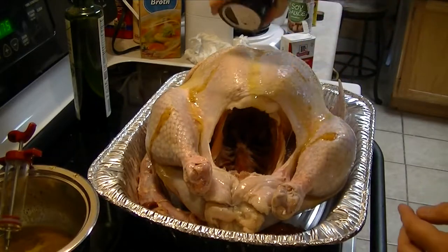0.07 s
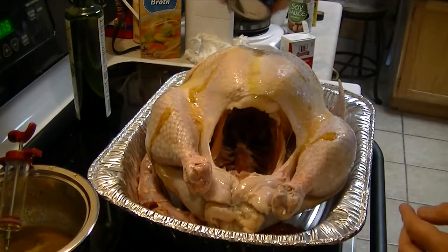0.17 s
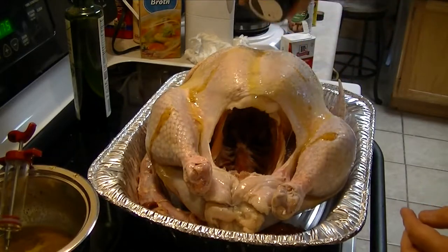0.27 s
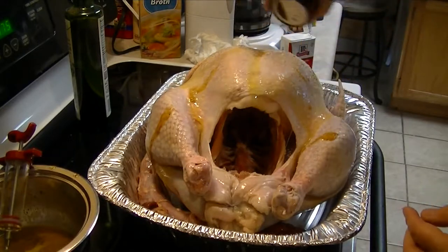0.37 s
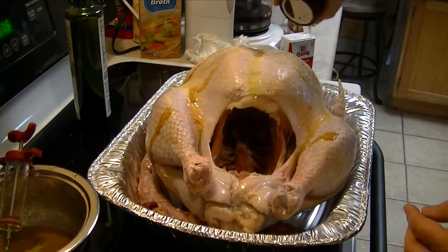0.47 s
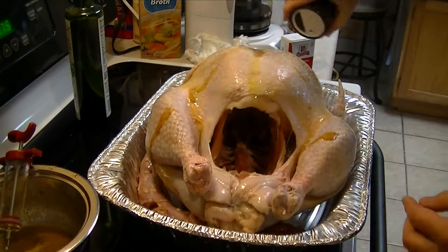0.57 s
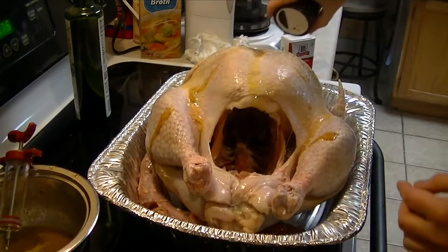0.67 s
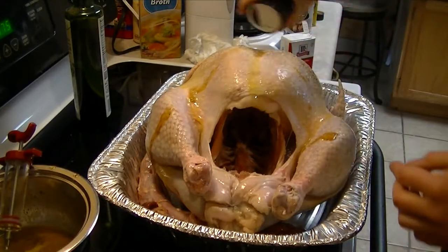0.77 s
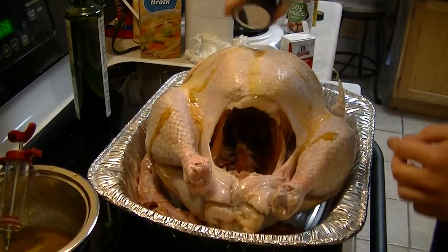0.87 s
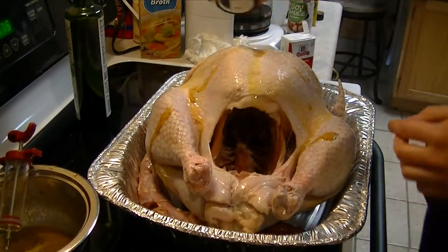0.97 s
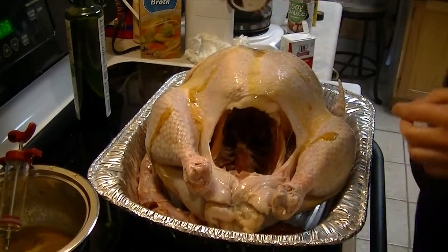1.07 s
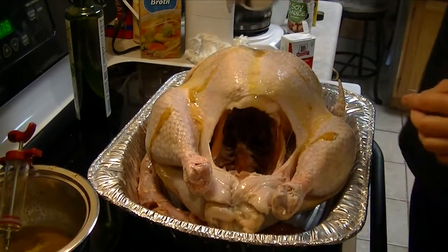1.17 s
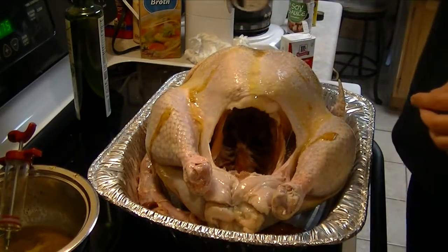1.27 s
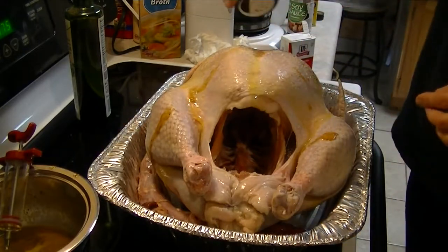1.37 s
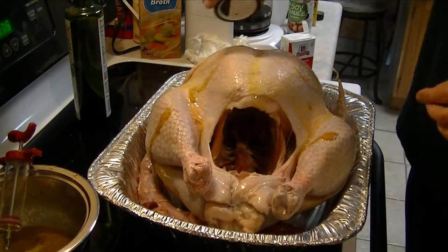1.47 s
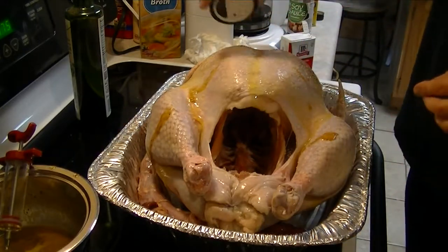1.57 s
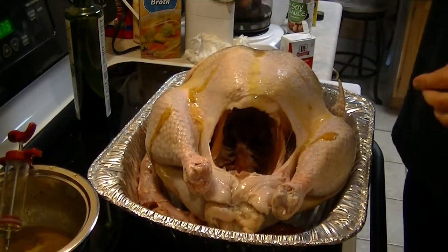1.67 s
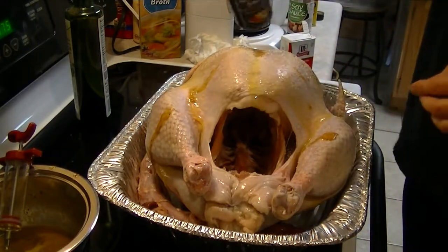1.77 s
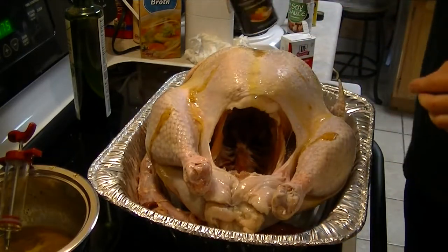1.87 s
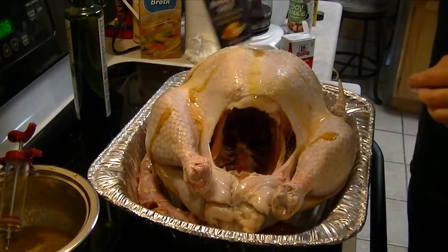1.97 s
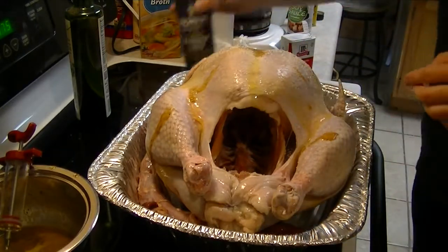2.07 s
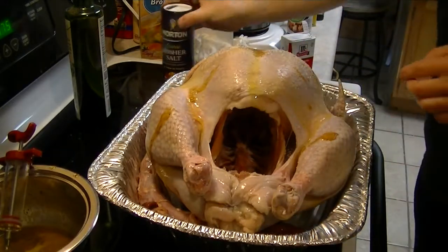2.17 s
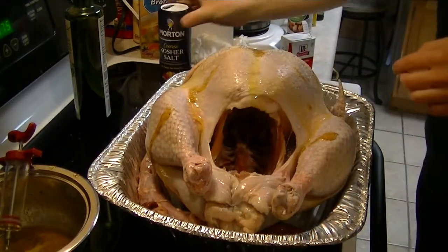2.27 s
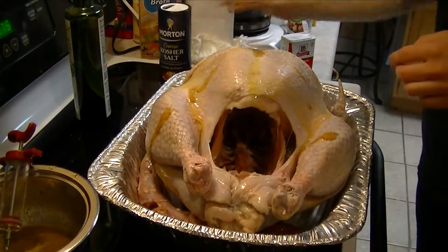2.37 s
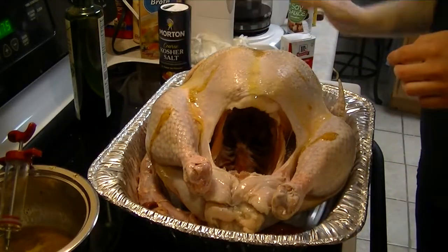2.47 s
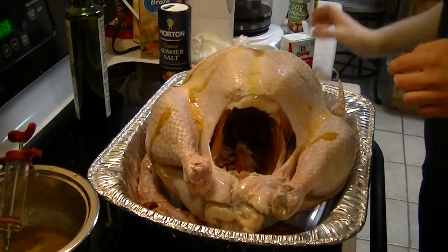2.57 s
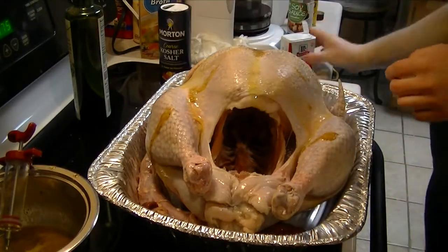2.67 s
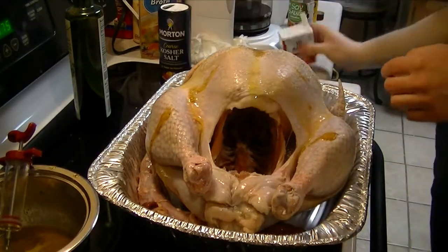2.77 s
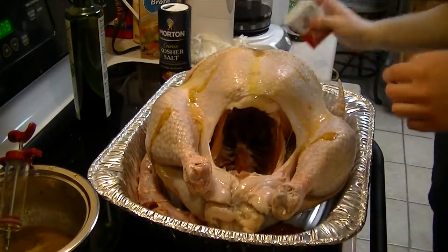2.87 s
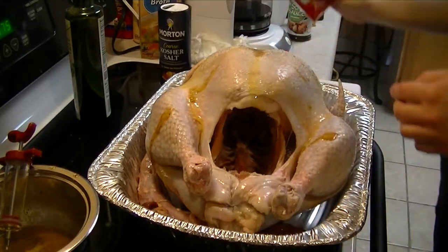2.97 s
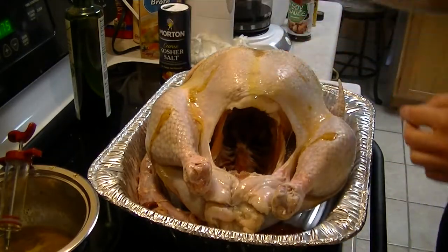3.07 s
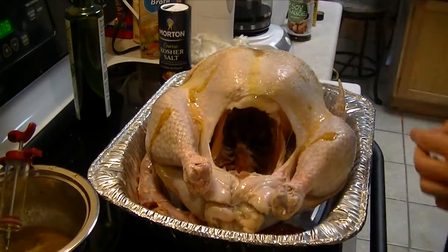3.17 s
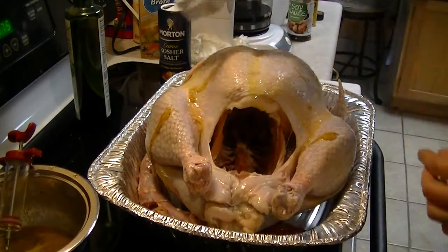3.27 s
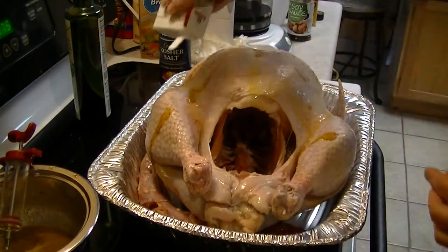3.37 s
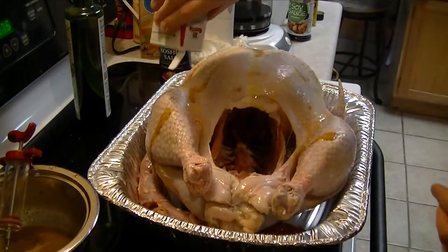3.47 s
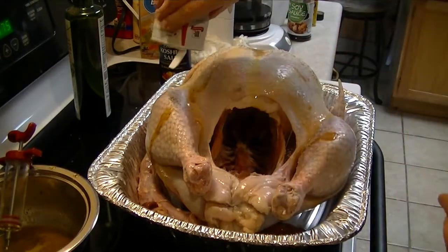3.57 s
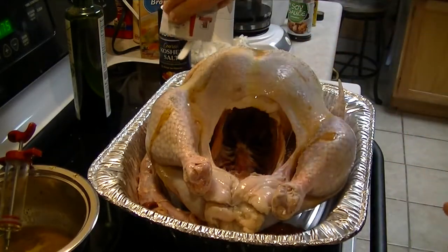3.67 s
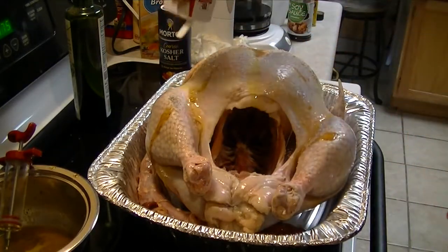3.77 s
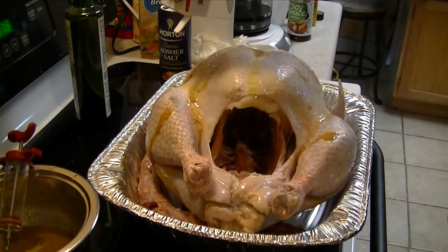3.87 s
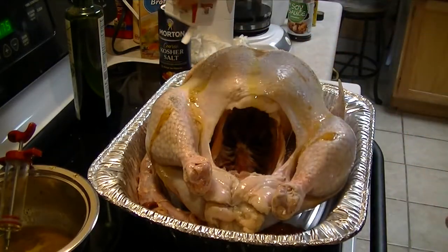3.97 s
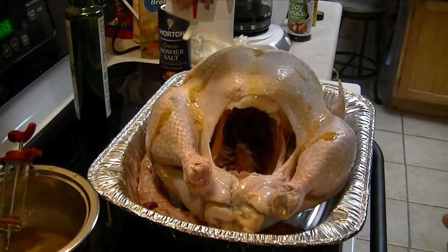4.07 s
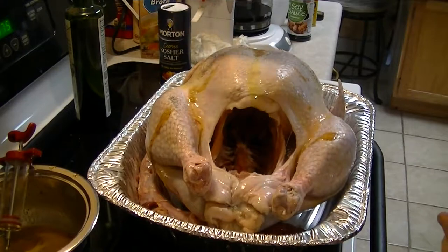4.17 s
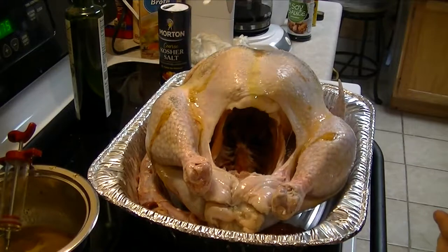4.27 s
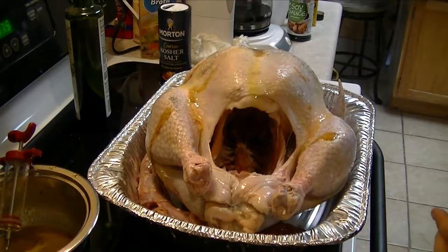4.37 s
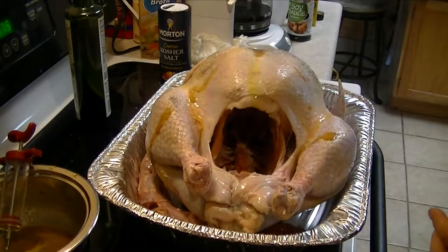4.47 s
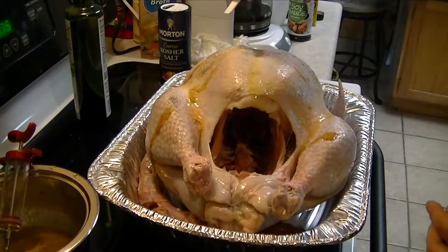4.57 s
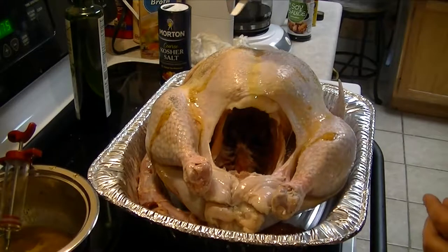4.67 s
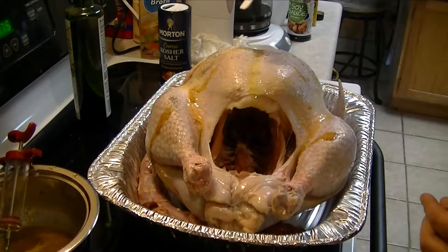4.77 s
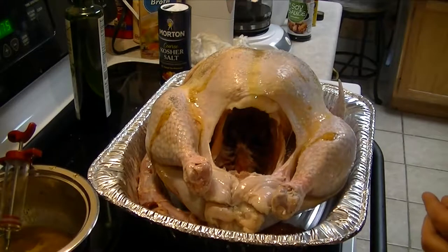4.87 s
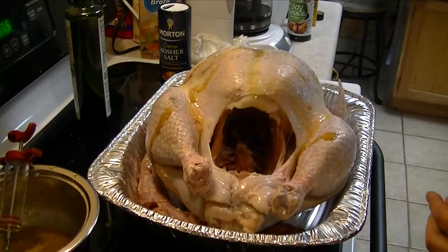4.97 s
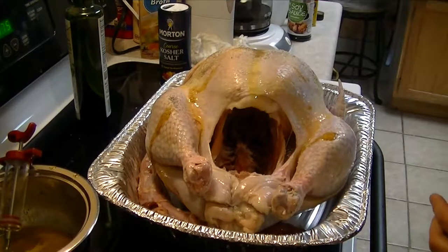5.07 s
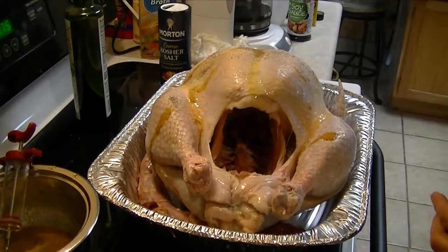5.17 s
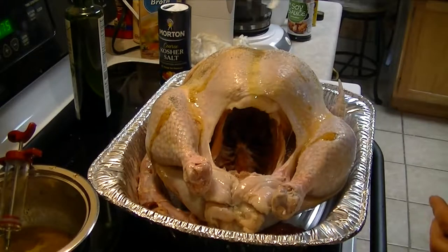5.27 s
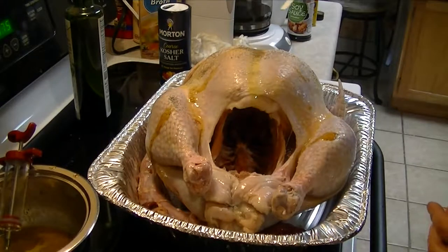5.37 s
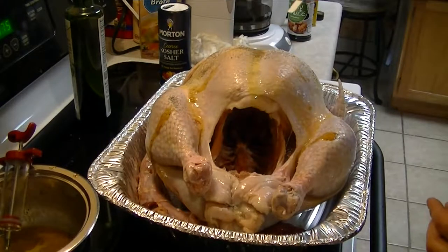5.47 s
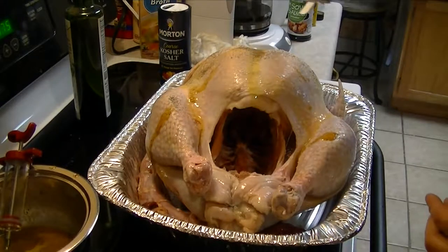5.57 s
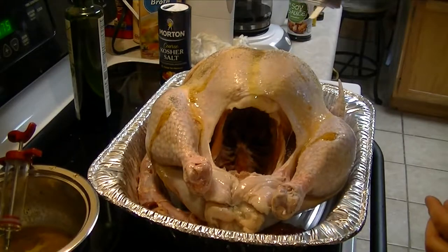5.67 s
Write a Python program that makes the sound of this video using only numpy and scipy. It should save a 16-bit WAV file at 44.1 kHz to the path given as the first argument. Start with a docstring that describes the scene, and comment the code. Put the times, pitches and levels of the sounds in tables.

```python
"""A small kitchen: coarse salt is poured from a canister over a raw turkey, and the canister is set down.
The salt is a dense stream of random grains, combed by gliding echoes off the canister.
The knock is a filtered push, a noise rattle and damped modes. A small pepper tin is picked up, its lid is
snapped open in a run of noise cracks, and it is shaken five or six times a second: the powder slaps the lid
on each down stroke and thuds on the bottom on the way back, as damped modes with puffs of noise."""
import sys
import numpy as np
from scipy import signal
from scipy.fft import rfft, irfft, next_fast_len
from scipy.io import wavfile
from scipy.ndimage import map_coordinates

SR = 44100
rng = np.random.default_rng(int(sys.argv[2]) if len(sys.argv) > 2 else 0)


def inscribe(sig):
    """Save sig as 16-bit PCM at rate SR to the path in sys.argv[1].

    A 1-D sig is mono; a 2-D sig holds one channel per row.
    Samples are clipped to [-1, 1] before scaling.
    """
    pcm = np.round(np.clip(np.atleast_2d(sig).T, -1, 1) * 32767)
    wavfile.write(sys.argv[1], SR, pcm.astype(np.int16))


N = 252252  # length in samples
T = np.arange(SR // 3) / SR  # time within one hit, s
TOP_HZ = 15800  # upper band limit


# level_db is a relative mix level; some players add a fixed gain to it.
def amp(db):
    """Decibels to gain."""
    return 10 ** (np.asarray(db) / 20)


def unit(x):
    """Scale to rms 1."""
    return x / np.sqrt(np.mean(x ** 2) + 1e-20)


def norm(x):
    """Scale to energy 1."""
    return x / np.sqrt(np.sum(x ** 2) + 1e-20)


def along(points, hz):
    """Read a curve of (Hz, value) points on a log frequency axis."""
    point_hz, values = np.transpose(points)
    return np.interp(np.log(hz + 1), np.log(point_hz + 1), values)


def wobble(rate):
    """A smooth random curve with rate knots a second."""
    knots = rng.standard_normal(int(N * rate / SR) + 4)
    return map_coordinates(knots, [np.arange(N) * rate / SR])


def fade(t, t60):
    """Exponential decay by 60 dB in t60 seconds."""
    return np.exp(-np.log(1000) * t / t60)


def puff(rise):
    """A gain that peaks at 1 after rise seconds and trails off."""
    return T / rise * np.exp(1 - T / rise)


def swell(s, width):
    """A smooth bell-shaped gain that rises to 1 at s seconds and falls again."""
    return np.exp(-((np.arange(N) / SR - s) / width) ** 2)


def colour(x, spectrum):
    """Causal minimum-phase filter with the gain of the (Hz, dB) points."""
    n = x.shape[-1]
    m = 2 * next_fast_len(n // 2 + 2048)
    gain = amp(along(spectrum, np.fft.rfftfreq(m, 1 / SR)))
    cepstrum = irfft(np.log(gain))
    # folding the cepstrum forward in time gives minimum phase
    cepstrum[1:m // 2] *= 2
    cepstrum[m // 2 + 1:] = 0
    return irfft(rfft(x, m) * np.exp(rfft(cepstrum)))[..., :n]


def soften(x, hz):
    """A softer contact loses its treble: a gentle low-pass."""
    return signal.lfilter(*signal.butter(1, min(hz, TOP_HZ), fs=SR), x)


def burst(t60):
    """A dying puff of noise with energy 1."""
    return norm(rng.standard_normal(len(T)) * fade(T, t60))


def grains(spectrum, rate):
    """Tiny random impacts, rate a second, at rms 1."""
    impacts = rng.standard_normal(N) * np.sqrt(rng.poisson(rate / SR, N))
    return unit(colour(impacts, spectrum))


def ring(modes, detune, scatter_db):
    """Damped (Hz, dB, t60 s) modes of alternating sign, a little different on every blow."""
    out = np.zeros(len(T))
    for k, (hz, db, t60) in enumerate(sorted(modes)):
        level = amp(db + scatter_db * rng.normal())
        struck_hz = hz * (1 + detune * rng.normal())
        out += (-1) ** k * level * fade(T, t60) * np.sin(2 * np.pi * struck_hz * T)
    return norm(out)


def sway(x, delay_ms, swing, echo_db):
    """An echo off the moving canister combs the sound with gliding ridges."""
    lag = delay_ms / 1000 * SR * np.exp(swing * wobble(3))
    echo = map_coordinates(x, [np.arange(N) - lag], order=3)
    return unit(x + amp(echo_db) * echo)


# decay of the room's tail: pitch_hz, t60_s
ROOM_DECAY = [(200, 0.46), (1000, 0.2), (4000, 0.27), (12000, 0.33)]


def kitchen(x, near_db, tail_db):
    """Direct sound, quick echoes off counter and cupboards, then the room's tail."""
    hz, t, z = signal.stft(rng.standard_normal(len(T)), SR, nperseg=256)
    decay = fade(t, along(ROOM_DECAY, hz)[:, None])
    tail = signal.istft(z * decay, SR, nperseg=256)[1][:len(T)]
    tail = tail * np.minimum(T / 0.014, 1)  # the tail builds up over 14 ms
    # twelve echoes at random moments and signs
    moments = (rng.uniform(.002, .016, size=12) * SR).astype(int)
    near = np.bincount(moments, rng.choice([-1, 1], size=12), len(T)) * fade(T, t60=.09)
    room = amp(near_db) * norm(near) + amp(tail_db) * norm(tail)
    return x + signal.fftconvolve(x, room)[:len(x)]


def add(track, s, sound):
    """Mix a sound in at s seconds."""
    start = max(round(s * SR), 0)
    track[start:start + len(sound)] += sound[:N - start]


# colour of the room noise: pitch_hz, gain_db
AIR_COLOUR = [(25, -56), (60, -37), (110, -29), (205, -23), (291, -11.5), (352, -5), (414, -10.5),
              (473, -10), (1010, -13), (1980, -14.5), (2660, -21), (3300, -15), (3880, -21), (9990, -30.5),
              (15800, -38.5)]
AIR_DB = -62.5  # mean level, before the flutter


def air():
    """Fluttering kitchen noise and a low drone; a mostly low layer has opposite sign in the two channels."""
    mid = unit(colour(rng.standard_normal(N), AIR_COLOUR))
    drone_colour = [(250, -62.5), (325, -12.0), (350, 0.5), (380, -26.0), (500, -47.5)]
    drone = amp(-78.5) * unit(colour(rng.standard_normal(N), drone_colour))
    side_colour = [(30, -3), (100, -5), (200, 0), (400, 7.0), (900, 5), (2000, -34), (8000, -51)]
    side = amp(-81.5) * unit(colour(rng.standard_normal(N), side_colour))
    return amp(AIR_DB) * mid * amp(0.84 * wobble(15.0)) + drone + np.array([side, -side])


# low, soft shuffles as the cook moves: middle_s, level_db, swell_s
SHUFFLES = [(.82, -62.5, 0.13), (1.05, -63, .12), (1.26, -60, 0.069), (2.68, -60.5, 0.42)]
# dull colour of the shuffles: pitch_hz, gain_db
SHUFFLE_COLOUR = [(120, -29.5), (230, -11.5), (330, 1.5), (400, 3), (520, -7.5), (700, 1), (1200, -32.5)]
# hands scuffing among the containers: start_s, level_db, rise_s
SCUFFS = [(2.428, -51, 0.021), (2.549, -57, 0.047), (2.68, -60.5, 0.077), (2.778, -48.5, 0.008)]
# hollow cardboard colour, shared with the salt slumps: pitch_hz, gain_db
CARDBOARD = [(150, -60), (250, -15), (415, -7.5), (507, -6.5), (730, 4), (920, -4), (1020, 2.5),
             (2130, -6.5), (3500, -12.5), (4550, -45), (7700, -120)]
SLEEVE_S, SLEEVE_DB, SLEEVE_WIDTH_S = 2.605, -61, 0.018  # a sleeve brushes past
REACH_DB, REACH_WIDTH_S = -65.5, 0.3  # the arm's fainter rustle around that moment


def handling():
    """Hands scuff on cardboard; sleeve and body rub as swelling streams of grains."""
    touch = np.zeros(N)
    for s, db, rise in SCUFFS:
        add(touch, s, amp(db) * puff(rise))
    scuffs = touch * amp(1.2 * wobble(65)) * grains(CARDBOARD, rate=1200)
    arm = amp(SLEEVE_DB) * swell(SLEEVE_S, SLEEVE_WIDTH_S) + amp(REACH_DB) * swell(SLEEVE_S, REACH_WIDTH_S)
    cloth = arm * grains([(800, -9), (2000, 8.5), (5500, 9), (9000, -6), (15000, -33)], rate=2200)
    movement = sum(amp(db) * swell(s, width) for s, db, width in SHUFFLES)
    shuffle = movement * grains(SHUFFLE_COLOUR, rate=2500)
    return kitchen(scuffs + cloth + shuffle, near_db=-6.5, tail_db=-8.0)


# light ticks as the containers are handled: start_s, level_db
LIGHT_TICKS = [(1.7022, -28.5), (2.05, -47), (2.142, -31), (3.2926, -32.5)]


def ticks():
    """Light, bright contacts: a click with a little short noise."""
    out = np.zeros(N)
    bright = [(100, -28), (400, -18), (1500, 2), (6000, 5.0), (11000, -3.5), (15000, -14)]
    for s, db in LIGHT_TICKS:
        tick = norm(colour((T == 0) + 0.24 * burst(0.0058), bright))
        add(out, s, amp(db + 6.5) * kitchen(tick, near_db=-1.0, tail_db=1.5))
    return out


# heaps of salt slumping in the canister as it is turned upright: start_s, level_db, pitch_hz
SALT_SLUMPS = [(1.77, -56.5, 910), (1.897, -46.5, 795), (1.965, -47, 1130), (2.046, -42.5, 1010)]
SLUMP_RISE_S, TRICKLE_RISE_S = 0.0094, .02  # the boom, and its loose crystals
TRICKLE_DB = -3  # relative to the boom


def slumps():
    """A heap of salt slides over and booms briefly in the cardboard tube; loose crystals trickle with it."""
    out, trickle = np.zeros(N), np.zeros(N)
    for s, db, hz in SALT_SLUMPS:
        boom = signal.lfilter(*signal.iirpeak(hz, 4, fs=SR), rng.standard_normal(len(T)))
        add(out, s, amp(db) * puff(SLUMP_RISE_S) * unit(soften(boom, hz=3000)))
        add(trickle, s, amp(db + TRICKLE_DB) * puff(TRICKLE_RISE_S))
    return out + kitchen(trickle * grains(CARDBOARD, rate=1200), near_db=-3.5, tail_db=-4.0)


# canister meeting the counter and rocking flat: start_s, level_db, hardness_hz (treble cutoff)
CANISTER_KNOCKS = [(2.1998, -14.5, 12100), (2.2121, -22, 2490)]
# colour of the struck counter: pitch_hz, gain_db
COUNTER_COLOUR = [(50, -57), (90, -29), (150, -27), (350, -9.5), (600, -3), (900, -1), (1500, -2),
                  (2200, -6), (3500, -13.5), (5500, -16.5), (8500, -16.5), (12000, -22), (15800, -27)]
# modes of the canister on the counter: pitch_hz, level_db, t60_s
CANISTER_MODES = [(167, -14.5, 0.18), (340, -5, 0.11), (494, 3, 0.16), (822, 8, 0.18), (1114, -14, 0.33),
                  (1330, -1, 0.13), (1500, 9, 0.1), (1636, -4, .16), (2140, -15, 0.18), (2426, 2.5, 0.098)]
# modes of the canister's metal spout: pitch_hz, level_db, t60_s
SPOUT_MODES = [(5930, -4, .14), (6520, -6, .18), (7350, -6, .25), (8300, 0, 0.26), (9500, -10, .16),
               (13830, -6, .2)]


def knocks():
    """The canister's rim strikes the counter: one push, a short rattle of salt, a hollow ring and a thin ping."""
    out = np.zeros(N)
    for s, db, hard_hz in CANISTER_KNOCKS:
        push = soften(norm(colour(1.0 * (T == 0), COUNTER_COLOUR)), hz=3120)
        rattle = norm(colour(burst(0.18), COUNTER_COLOUR))
        blow = kitchen(push + amp(-3) * rattle, near_db=-12.5, tail_db=-6.5)
        ping = kitchen(ring(SPOUT_MODES, detune=0.0017, scatter_db=.7), near_db=1.5, tail_db=-1)
        hollow = ring(CANISTER_MODES, detune=0.0015, scatter_db=3.0)
        body = amp(-4.5) * hollow + amp(-24) * ping
        add(out, s, amp(db + 20) * soften(blow + body, hard_hz))
    return out


# the tin's plastic lid unlatching and flipping open: start_s, level_db
LID_CRACKS = [(3.3569, -33), (3.359, -17.5), (3.3657, -21), (3.3723, -26), (3.391, -28)]
# colour of the plastic: pitch_hz, gain_db
PLASTIC_COLOUR = [(71, -34), (120, -25.5), (200, -17), (270, -21), (420, -1), (540, -10.5), (770, 0),
                  (1000, -1), (1210, -3.5), (1630, -2.5), (1970, -10.5), (2510, -7), (5580, -17),
                  (7580, -19.5), (15800, -41)]


def lid():
    """The lid flips open in a quick run of cracks, each a short burst of noise."""
    out = np.zeros(N)
    for s, db in LID_CRACKS:
        crack = norm(soften(colour(burst(0.024), PLASTIC_COLOUR), hz=5100))
        add(out, s, amp(db + 16.5) * kitchen(crack, near_db=-7, tail_db=-2.0))
    return out


# pepper sifting through the holes in loose swishes: start_s, level_db, rise_s
PEPPER_SWISHES = [(3.372, -49, 0.019), (3.5, -65.5, 0.049), (4.07, -67.5, 0.035), (4.42, -70.5, 0.033),
                  (4.605, -67, 0.023), (5.018, -68, 0.0075), (5.25, -69.5, 0.037), (5.565, -67.5, 0.028)]
FLECKS_PER_S, FLECK_DB = 70, -78.5  # coarse flecks ticking on the foil pan while the tin is shaken


def sifting():
    """Pepper swishes as the tin is flicked over, whispers through the holes on down strokes and ticks on foil."""
    flow = np.zeros(N)
    for s, db, rise in PEPPER_SWISHES:
        add(flow, s, amp(db) * puff(rise))
    for s, db in DOWN_STROKES:
        add(flow, s, amp(db - 52.0) * puff(rise=0.016))
    pepper = flow * grains([(2000, -25), (5000, 1.5), (9000, -4.5), (12000, -4.0), (15000, -14)], rate=1500)
    t = np.arange(N) / SR
    shaking = (t > DOWN_STROKES[0][0]) & (t < BACK_STROKES[-1][0])
    foil = grains([(2000, -25), (6000, -2), (12000, -2), (15000, -5)], rate=FLECKS_PER_S)
    flecks = amp(FLECK_DB) * shaking * foil
    return kitchen(flecks, near_db=-2, tail_db=-3.5) + pepper


# the pepper tin bumping its neighbour as it is picked up: start_s, level_db
TIN_BUMPS = [(2.7844, -28.5), (2.788, -33), (2.809, -40)]
# modes of the bump: pitch_hz, level_db, t60_s
BUMP_MODES = [(324, -12.5, 0.11), (517, -2.5, 0.03), (966, 0, 0.08), (1340, -8, 0.05), (1950, -8, 0.035),
              (4530, -15, 0.022)]


def bumps():
    """Small dull contacts that ring in a few short modes."""
    out = np.zeros(N)
    for s, db in TIN_BUMPS:
        bump = ring(BUMP_MODES, detune=0.04, scatter_db=1.5)
        add(out, s, amp(db + 15.0) * kitchen(bump, near_db=-16, tail_db=-9.5))
    return out


# flow of salt from the canister: time_s, level_db
SALT_FLOW = [(0.0, -47), (0.06, -53.5), (0.08, -44), (0.16, -43.5), (0.22, -54.5), (0.28, -45),
             (0.47, -51.5), (0.56, -43), (0.64, -51.5), (0.67, -42.5), (0.74, -54), (0.83, -50.5),
             (0.84, -61.5), (0.95, -44), (1.21, -40), (1.24, -45), (1.6, -43), (1.68, -53), (1.83, -40.5),
             (2.01, -57), (2.07, -46.5), (2.18, -68)]
# colour of the salt landing: pitch_hz, gain_db
SPRAY_COLOUR = [(1760, -41), (3000, -14), (5200, -0.5), (7670, -3.5), (12700, 3.5), (14700, -5),
                (15800, -11)]
# colour of the salt sliding on the canister wall: pitch_hz, gain_db
SLIDE_COLOUR = [(300, -26), (500, -12.5), (900, -5.5), (1500, -5), (2400, -2.5), (3600, 1.5), (6500, -1.5),
                (10000, -12), (15800, -29)]
# clumps of salt leaving the spout: start_s, level_db, length_s (loudest a quarter of the way in)
SALT_SPURTS = [(0.0024, -27, 0.019), (0.541, -27, 0.017), (0.582, -21, 0.011), (0.6644, -23, 0.014),
               (1.042, -31, 0.07), (1.196, -23, 0.031), (1.557, -26.5, 0.061), (1.782, -24.5, 0.072)]
SPRAY_DB, SLIDE_DB = -3, -5.5  # landing and sliding, relative to the flow
SPRAY_ECHO_DB, WALL_ECHO_DB = -15, -9  # echoes off the moving canister
CRYSTALS_PER_S, CRYSTAL_DB = 520, -14  # big single crystals ticking within the stream


def salt():
    """A dense, uneven stream of crystals slides out of the canister, now and then in a clump."""
    times, flow_db = np.transpose(SALT_FLOW)
    flow = np.interp(np.arange(N) / SR, times, amp(flow_db), right=0)
    spray = sway(grains(SPRAY_COLOUR, rate=13000), delay_ms=0.713, swing=0.28, echo_db=SPRAY_ECHO_DB)
    wall = sway(grains(SLIDE_COLOUR, rate=9000), delay_ms=1.606, swing=0.198, echo_db=WALL_ECHO_DB)
    wall = wall * amp(2.1 * wobble(21.07))
    stream = flow * (amp(SPRAY_DB) * spray + amp(SLIDE_DB) * wall) * amp(1.22 * wobble(54.72))
    stream = stream + amp(CRYSTAL_DB) * flow * grains(SPRAY_COLOUR, rate=CRYSTALS_PER_S)
    clump_colour = [(100, -50), (300, -30), (1200, -9.5), (3000, -0.5), (7000, 0.5), (15000, -3.0)]
    for s, db, length in SALT_SPURTS:
        clump = unit(colour(rng.standard_normal(len(T)), clump_colour))
        add(stream, s, amp(db - 14) * puff(length / 4) * clump)
    return kitchen(stream, near_db=-14.0, tail_db=-15.5)


# powder falling back on the bottom: start_s, level_db
BACK_STROKES = [(3.438, -20.5), (3.64, -23.5), (3.824, -25.5), (3.997, -25.5), (4.177, -26.5), (4.362, -28),
                (4.546, -29), (4.726, -27.5), (4.901, -27.5), (5.083, -29), (5.269, -26), (5.449, -29),
                (5.633, -28)]
# modes of the hand-held tin, for both strokes: pitch_hz, t60_s, lid_level_db, bottom_level_db
TIN_MODES = [(549.4, 0.064, -12.5, -19), (683, 0.035, -7.5, -13.5), (1207, 0.023, -7, -7.5),
             (1404, 0.033, -8, -21.5), (1680, 0.015, -7, -12), (2274, 0.011, -6, -14.5),
             (2960, 0.015, -14.5, -46), (3613, 0.027, -12.5, -69), (4450, 0.016, -20.5, -76)]
# colour of the loose powder, for both strokes: pitch_hz, gain_db
POWDER_COLOUR = [(120, -45), (200, -39), (410, -10.5), (581, 2.5), (774, 3), (968, -2), (1420, -14.5),
                 (1770, -9.5), (2900, -7.5), (3630, -8.5), (5850, -25.5), (9000, -44), (11700, -44),
                 (19800, -120)]
BOTTOM_HZ = 1032  # resonance of the tin's bottom


def back_strokes():
    """The pepper falls back softly and drums on the tin's bottom."""
    out = np.zeros(N)
    for s, db in BACK_STROKES:
        modes = [(hz, at_bottom, t60) for hz, t60, _, at_bottom in TIN_MODES]
        modes.append((BOTTOM_HZ, 0, .022))
        thud = ring(modes, detune=0.022, scatter_db=1.5)
        thud = norm(thud * (1 - np.exp(-T / 0.00035)))  # a slightly rounded attack
        thud = thud + amp(-24) * norm(colour(burst(0.042), POWDER_COLOUR))
        add(out, s, amp(db + 18) * norm(kitchen(thud, near_db=-8.5, tail_db=-10)))
    return out


# powder hitting the lid: start_s, level_db
DOWN_STROKES = [(3.577, -26), (3.762, -25.5), (3.947, -27.5), (4.114, -25.5), (4.306, -26.5), (4.49, -28.5),
                (4.661, -26.5), (4.841, -27), (5.024, -28), (5.207, -27), (5.393, -27.5), (5.57, -26.5)]
LID_HZ, LID_SAG_HZ_PER_S = 825, 98  # the lid's resonance sinks as the shaking goes on
WALL_HZ, WALL_SCATTER = 2158, 0.066  # the wall's resonance shifts with the grip from stroke to stroke
WALL_DB, WALL_GROWS_DB_PER_S = -7.5, 2  # and rings more freely with time


def down_strokes():
    """The slug of pepper slaps the lid amid loose grains; the resonances shift with the grip and the fill."""
    out = np.zeros(N)
    for s, db in DOWN_STROKES:
        elapsed = s - DOWN_STROKES[0][0]
        lid_mode = (LID_HZ - LID_SAG_HZ_PER_S * elapsed, -6, .042)
        wall_hz = WALL_HZ * (1 + WALL_SCATTER * rng.normal())
        wall_mode = (wall_hz, WALL_DB + WALL_GROWS_DB_PER_S * elapsed, .025)
        modes = [(hz, at_lid, t60) for hz, t60, at_lid, _ in TIN_MODES] + [lid_mode, wall_mode]
        loose = norm(colour(burst(0.067), POWDER_COLOUR))
        slap = ring(modes, detune=0.0079, scatter_db=1.3) + amp(-1) * loose
        add(out, s, amp(db + 17.5) * norm(kitchen(slap, near_db=-10, tail_db=-9.0)))
    return out


def tin():
    """The tin is too small to radiate bass, so its strokes and bumps are high-passed."""
    no_bass = signal.butter(2, 230, "high", fs=SR, output="sos")
    return signal.sosfilt(no_bass, down_strokes() + back_strokes() + bumps())


def scene():
    """The salt is mixed equally in both channels; everything else is 1.4 dB louder in the right."""
    things = handling() + slumps() + knocks() + lid() + ticks() + tin() + sifting()
    return salt() + (things + air()) * amp([[-.7], [.7]])  # left, right dB


def record(dry):
    """The microphone sheds deep bass and keeps nothing above its band limit."""
    thin = signal.sosfilt(signal.butter(1, 70, "high", fs=SR, output="sos"), dry)
    m = next_fast_len(N + SR // 2)
    in_band = np.fft.rfftfreq(m, 1 / SR) < TOP_HZ
    return irfft(rfft(thin, m) * in_band, m)[:, :N]


dry = scene()
out = record(dry)
inscribe(out)
```